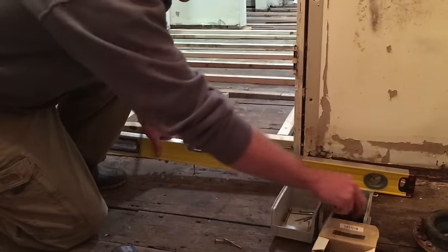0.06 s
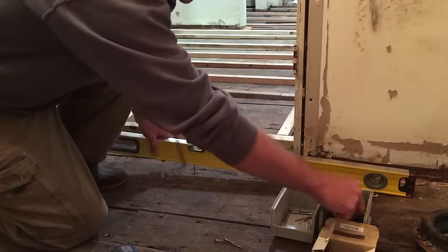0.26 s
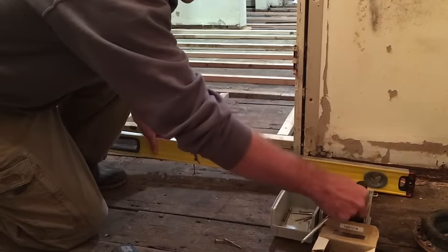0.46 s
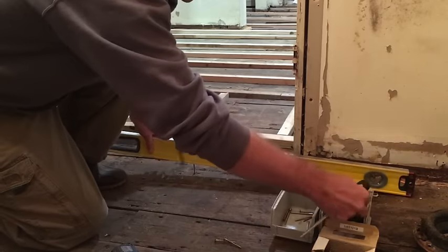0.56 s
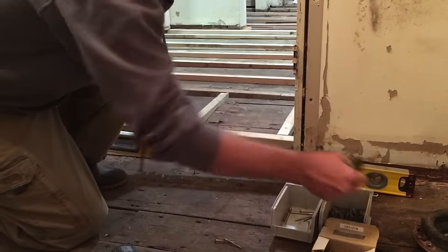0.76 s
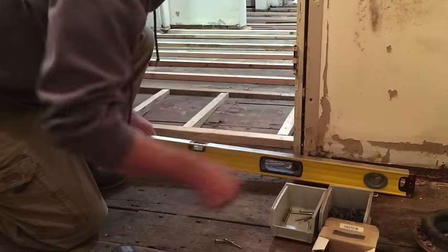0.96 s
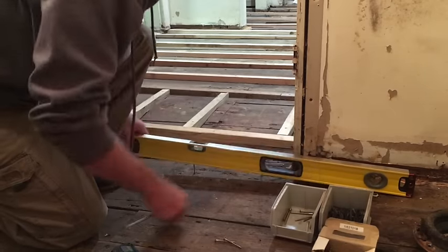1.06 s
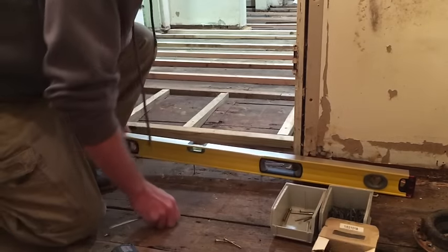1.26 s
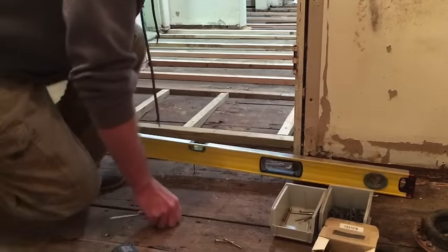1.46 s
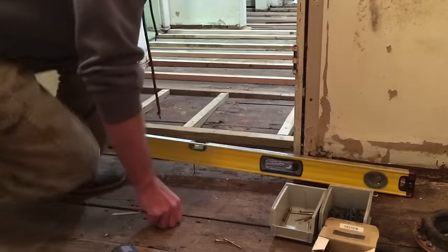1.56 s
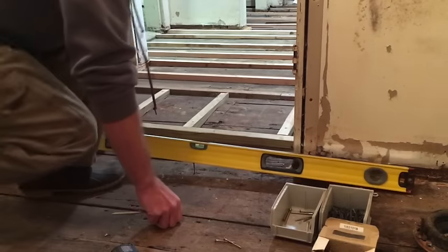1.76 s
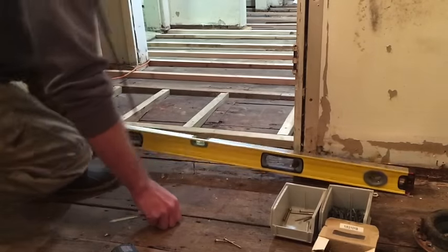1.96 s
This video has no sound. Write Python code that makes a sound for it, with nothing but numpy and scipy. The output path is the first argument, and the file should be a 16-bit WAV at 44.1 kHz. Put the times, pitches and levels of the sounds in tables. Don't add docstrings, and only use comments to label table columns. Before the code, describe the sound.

Loose screws rattle in a small plastic bin, stirred briskly from 0.17 to 0.55 s, with hollow wall knocks and bright jingles. One drops back at 0.67 s, landing hard at 0.77 s and ringing high. From 1 s clothes rustle, grit and a tool tick faintly, and a knee thuds on boards near 1.2 s. At 1.86 s a boot lands heavily, scuffs and squeaks. Low rumble, bare-room echo.

```python
import sys
import numpy as np
from scipy import signal
from scipy.fft import rfft, irfft
from scipy.io import wavfile
from scipy.ndimage import uniform_filter1d

SR = 44100
rng = np.random.default_rng(int(sys.argv[2]) if len(sys.argv) > 2 else 0)


def digitize_waveform(pressure):
    field = np.atleast_2d(pressure).T
    bounded = np.clip(field, -1, 1)
    quanta = np.round(bounded * 32767).astype(np.int16)
    wavfile.write(sys.argv[1], SR, quanta)


def to_linear_factor(level_db):
    exponent = np.asarray(level_db, float) / 20
    return 10 ** exponent


N = 88200


def unit(x):
    return x / np.sqrt(np.mean(x ** 2))


def conv(x, h):
    return signal.fftconvolve(x, h)[:N]


def colour(x, table):
    hz, db = np.array(table).T
    log_hz = np.log(np.arange(len(x) // 2 + 1) * SR / len(x) + 1)
    return irfft(rfft(x) * to_linear_factor(np.interp(log_hz, np.log(hz), db)), len(x))


def curve(table):
    rows = np.array(table, float).T
    return [np.interp(np.arange(N) / SR, rows[0], column) for column in rows[1:]]


def after(s):
    return np.arange(N) > s * SR


def walk(rate):
    k = int(SR / rate)
    steps = np.repeat(rng.standard_normal(N // k + 3), k)
    smooth = uniform_filter1d(uniform_filter1d(steps, k), k)
    return unit(smooth[k:N + k])


def fade(t60, size=8192):
    return np.exp(-np.log(1000) * np.arange(size) / SR / max(t60, .002))


def rise(x, s):
    return x * (1 - np.exp(-np.arange(len(x)) / SR / s))


def ring(modes, sizes, size=8192, detune=0.):
    t = np.arange(size) / SR
    luck = rng.standard_normal((len(modes), 2))
    out = 0
    for (hz, db, t60), weight, (shift, turn) in zip(modes, sizes, luck):
        tone = np.sin(2 * np.pi * hz * (1 + detune * shift) * t + np.pi * turn)
        out = out + weight * to_linear_factor(db) * tone * fade(t60, size=size)
    return out


def near(modes, hz, octaves):
    return np.exp(-(np.log2(np.array(modes)[:, 0] / hz) / octaves) ** 2)


def add(out, s, x):
    i = int(s * SR)
    out[i:i + len(x)] += x[:max(N - i, 0)]


def bands(low_hz=25):
    for hz in low_hz * 2. ** np.arange(10):
        shape = [(hz / 2, -30), (hz / 1.242, 0), (hz * 1.337, 0), (hz * 2, -30)]
        yield hz, colour(rng.standard_normal(N), shape)


# (frequency [Hz], level [dB per Hz])
ROOM_NOISE = [(12, -86), (20, -6.5), (113, -4.5), (277, -15), (310, -13), (472, -23), (1660, -30),
              (1910, -30.5), (16000, -51)]


def room_noise():
    flicker_db, level_db = .8, -51
    x = sum(noise * to_linear_factor(flicker_db * walk(8.5)) for _, noise in bands())
    return unit(colour(x, ROOM_NOISE)) * to_linear_factor(level_db)


# (frequency [Hz], level [dB per Hz])
CRACK = [(710, -15.5), (1200, -7.5), (4260, -13), (6000, -19.5), (10400, -29), (11800, -27), (12900, -38),
         (14800, -47.5), (16000, -40)]


def crack():
    x = colour(rng.standard_normal(size=1024), CRACK)
    return unit(x) * fade(0.015, size=1024) / 2


# (time [s], level [dB], brightness [dB])
STIR = [
    (.171, -51, -1),
    (.182, -30.5, -7.5),
    (.225, -34, -12),
    (.30, -28.5, -5),
    (.36, -42.5, -33),
    (.418, -46.5, 5),
    (.44, -43.5, 6),
    (.54, -43, -21),
    (.6, -64, -3),
]
# (time [s], level [dB], brightness [dB])
SETTLE = [
    (.672, -43.5, 3),
    (0.678, -39, -1.5),
    (0.762, -47, -4),
    (0.773, -28.5, -8),
    (0.818, -54, -1),
    (0.899, -86, -28),
]
# (time [s], wall knock [dB], metal crack [dB], strongest ring [Hz])
KNOCKS = [(0.178, -13, -22.5, 2480), (0.184, -15, -28, 1080), (0.189, -17.5, -43.5, 1040),
          (0.206, -15, -40, 1050), (0.2351, -17.5, -23, 1080), (.253, -13, -18, 1100),
          (.265, -25, -18, 2000), (.275, -15.5, -40, 1040), (.284, -12.5, -16.5, 2560),
          (.295, -14, -16, 1050), (.301, -16, -36, 1070), (.312, -16, -24, 3300), (0.411, -28, -35, 1500),
          (0.4217, -13, -22.5, 2550), (0.429, -18.5, -35, 1200), (0.478, -24.5, -55, 1000),
          (.453, -26, -40, 2500), (0.5214, -20.5, -22.5, 1760), (.674, -18, -24, 1150),
          (0.695, -10.5, -26, 1220), (.712, -23, -43.5, 1250), (0.74, -29.5, -36, 2300),
          (.7695, -18, -7.5, 1340), (.771, -7.5, -4, 1486), (.7735, -11.5, -8.5, 1570),
          (.780, -22, -17.5, 1630), (0.79, -22, -20, 1510), (.803, -23, -30.5, 1590),
          (.817, -38, -28, 1660)]
# (frequency [Hz], level [dB], t60 [s])
BIN_WALLS = [(681, -6, 0.026), (750, -7.5, 0.021), (863, -7.5, 0.018), (978.5, -2.5, 0.027),
             (1056, -0.5, 0.037), (1150, -2.5, 0.023), (1245, -4, 0.024), (1450, 1.5, 0.0087),
             (1712, -2.5, 0.023), (1813, -7.5, 0.0324), (2210, 0.5, 0.016), (2500, 3.5, 0.0128),
             (3060, -7.5, 0.031), (3542, -10, 0.0226)]
# (frequency [Hz], level [dB])
SHANKS = [(5550, 3), (7500, -5), (8850, 5.5), (11550, 3), (12250, -5), (14300, -2), (15050, -2)]


def screws_in_bin():
    contacts_per_s, scatter_db = 1500, 3.2
    contact_s = 0.00057
    jingle_db, jingle_t60_s = -7.5, 0.017
    wall_trim_db, crack_trim_db = -6, -1
    shanks = [(hz, db, jingle_t60_s) for hz, db in SHANKS]
    damped_walls = [(hz, db, t60 * .6) for hz, db, t60 in BIN_WALLS]
    out = np.zeros(N)
    for spot in range(8):
        struck = rng.random(N) < contacts_per_s / 8 / SR
        hits = struck * rng.standard_normal(N) * to_linear_factor(scatter_db * rng.exponential(size=N))
        wall_ring = ring(BIN_WALLS, np.ones(len(BIN_WALLS)), detune=0.02)
        wall = unit(conv(hits, rise(wall_ring, contact_s)))
        jingle = unit(conv(hits, ring(shanks, rng.random(len(shanks)), detune=0.015)))
        metal = unit(conv(hits, crack())) + to_linear_factor(jingle_db) * jingle
        for table in (STIR, SETTLE):
            db, bright_db = curve(table)
            on = after(table[0][0]) & (np.arange(N) < table[-1][0] * SR)
            out += on * to_linear_factor(db) * (wall + to_linear_factor(bright_db) * metal) / 3
    for s, wall_db, crack_db, hz in KNOCKS:
        knock = ring(damped_walls, near(BIN_WALLS, hz, 0.73), detune=0.02)
        add(out, s, to_linear_factor(wall_db + wall_trim_db) * rise(knock, contact_s))
        add(out, s, to_linear_factor(crack_db + crack_trim_db) * rise(crack(), contact_s / 2))
    return signal.sosfilt(signal.butter(6, 580, "high", fs=SR, output="sos"), out)


def bin_rumble():
    shake = colour(rng.standard_normal(N), [(50, -20), (110, -7.5), (260, -1), (420, -5), (700, -25.5)])
    stir_db = curve(STIR)[0]
    return unit(shake) * to_linear_factor(stir_db - 14.5 + 2 * walk(31)) * after(STIR[0][0])


# (time [s], frequency [Hz], level [dB], t60 [s])
SCREW_RINGS = [(.177, 14300, -45, .02), (.181, 5400, -42, .03), (.196, 8880, -49, .04),
               (.216, 11500, -50, .04), (.229, 15100, -48, .12), (.2352, 8800, -40, .03),
               (.2352, 11600, -42, .05), (.2352, 14400, -41, .03), (.241, 5600, -41, .03),
               (.262, 11500, -48, .05), (.281, 12250, -42, .06), (.284, 5600, -40, .03),
               (.33, 13900, -54, .2), (.364, 11500, -54, .02), (.411, 15100, -48, .03),
               (.413, 11550, -48, .03), (.4213, 11550, -39, .04), (.422, 6500, -45, .02),
               (.434, 11550, -43, .1), (.447, 7500, -44, .1), (.448, 7526, -58, .25),
               (.448, 8877, -48, .12), (.4537, 14430, -41, .025), (.466, 14300, -44, .025),
               (.468, 15000, -49, .16), (.481, 14300, -50, .03), (.522, 7526, -52, .04),
               (.541, 8877, -51, .04), (.556, 8877, -62, .12), (.674, 11970, -33, .38),
               (.684, 6158, -35, .22), (.674, 13160, -49, .15), (.674, 13890, -49, .15),
               (.770, 11990, -25, .12), (.75, 6169, -48, .2)]
# (time [s], frequency [Hz], level [dB], t60 [s])
TOOL_PINGS = [
    (1.0326, 3300, -54, .015),
    (1.0326, 4300, -56, .015),
    (1.1164, 4300, -51, .02),
    (1.295, 4300, -56, .015),
    (1.3229, 5500, -52, .015),
    (1.945, 4700, -52, .02),
]


def metal_rings(table):
    out = np.zeros(N)
    for s, hz, db, t60 in table:
        wobble = to_linear_factor(2. * walk(83)[:16384])
        tone = rise(ring([(hz, 0, t60)], [1], size=16384), 0.00013)
        add(out, s, to_linear_factor(db) * tone * wobble)
    return out


# (time [s], level [dB], strongest ring [Hz])
THUDS = [(0.186, -49.5, 241), (.28, -46, 290), (0.422, -41, 242), (0.549, -52, 101), (0.793, -45, 95.5),
         (0.858, -49, 88), (0.932, -52, 90), (0.982, -38.5, 91), (1.184, -37, 413), (1.191, -27, 169),
         (1.196, -35.5, 404), (1.197, -42, 530), (1.205, -34, 48), (1.212, -37.5, 172.7),
         (1.212, -37.5, 255), (1.231, -39.5, 345), (1.399, -34.5, 136.6), (1.497, -34.5, 293),
         (1.50, -44, 410), (1.524, -47, 410), (1.975, -36, 200), (1.71, -33.5, 82.1), (1.859, -22, 398),
         (1.859, -36.5, 2100), (1.858, -26.5, 695), (1.859, -31.5, 1120), (1.858, -38, 2550),
         (1.872, -25.5, 800), (1.861, -26, 249.6), (1.862, -27.5, 545), (1.866, -19.5, 149),
         (1.879, -20, 348), (1.880, -25, 533), (1.886, -21.5, 140), (1.899, -24, 250), (1.922, -26, 140),
         (1.925, -31.5, 354), (1.941, -27.5, 160), (1.961, -18.5, 52.8)]
# (frequency [Hz], level [dB], t60 [s])
BOARDS = [(48, 0, 0.2), (88, 0, 0.16), (141, 0, 0.1), (166, 0, 0.13), (250, 0, 0.08), (288, -3, 0.06),
          (345, 0, 0.07), (408, 0, 0.1), (540, 0, 0.06), (690, -3, 0.03), (800, -3, 0.02), (1117, 0, 0.03),
          (2000, 0, 0.04), (2550, -2, 0.027)]


def board_thuds():
    out = np.zeros(N)
    for s, db, hz in THUDS:
        thud = ring(BOARDS, near(BOARDS, hz, 0.14), size=16384, detune=0.0092)
        add(out, s, to_linear_factor(db) * rise(thud, 0.65 / hz))
    return out


# (time [s], level [dB])
RUSTLE = [
    (1.0, -62.5),
    (1.17, -73),
    (1.19, -60.5),
    (1.31, -68),
    (1.33, -58.5),
    (1.42, -58.5),
    (1.55, -62.5),
    (1.85, -60.5),
]
# (frequency [Hz], level [dB per Hz])
CLOTH = [(350, -0.5), (600, -1), (997, -3), (1130, -2.5), (4460, -10.5), (11800, -19), (16000, -28)]


def cloth_rustle():
    grains = rng.standard_normal(N) * to_linear_factor(0.74 * rng.exponential(size=N) + 2 * walk(39.6))
    fabric = unit(colour(grains, [(300, -8.0)] + list(CLOTH)))
    return fabric * to_linear_factor(curve(RUSTLE)[0]) * after(.9)


# (time [s], level [dB])
TICKS = [
    (0.9262, -31),
    (1.0326, -41),
    (1.1164, -43.5),
    (1.1797, -38),
    (1.295, -40.5),
    (1.3229, -33.5),
    (1.6902, -39),
    (1.8592, -40),
]


def grit_ticks():
    out = np.zeros(N)
    for s, db in TICKS:
        burst = unit(np.diff(colour(rng.standard_normal(size=1024), CLOTH)))
        add(out, s, to_linear_factor(db - 16) * burst * fade(0.01, size=1023))
    return out


# (time [s], level [dB])
SCUFF = [
    (1.85, -69),
    (1.86, -46.5),
    (1.9, -53),
    (1.93, -57),
    (2.0, -51),
]


def sole_scuff():
    hz = 1100
    grains = rng.standard_normal(N) * to_linear_factor(3.3 * rng.exponential(size=N))
    drag = colour(grains, [(hz / 3, -8), (hz, 0), (hz * 2, -6), (hz * 4, -30)])
    return unit(drag) * to_linear_factor(curve(SCUFF)[0])


# (time [s], frequency [Hz], level [dB])
CHIRP = [
    (1.915, 1044, -42.5),
    (1.925, 1100, -58),
    (1.957, 1270, -49),
    (1.97, 1340, -76),
]
# (time [s], frequency [Hz], level [dB])
SQUEAK = [
    (1.962, 500, -58),
    (1.98, 525, -31),
    (1.987, 545, -38),
    (1.995, 590, -34),
    (2.0, 610, -40),
]


def sole_squeak(table):
    hz, db = curve(table)
    rough = .015 * np.tanh(walk(100))
    phase = 2 * np.pi * np.cumsum(hz * (1 + rough)) / SR
    return after(table[0][0]) * to_linear_factor(db) * (np.sin(phase) + 0.049 * np.sin(3 * phase))


# (frequency [Hz], t60 [s])
ROOM = [(100, 0.4), (500, 0.34), (1500, 0.35), (4000, 0.3), (8000, 0.26), (14000, 0.14)]


def room():
    level_db, gap_s, size = -3.5, 0.0014, 32768
    f, t60 = np.array(ROOM).T
    tail = np.zeros(size)
    for hz, noise in bands():
        tail += noise[:size] * fade(np.interp(np.log(hz), np.log(f), t60), size=size)
    tail = tail * (1 - np.exp(-(np.arange(size) / SR / gap_s) ** 2))
    return to_linear_factor(level_db) * tail / np.sqrt(np.sum(tail ** 2))


def scene():
    thuds, tones = board_thuds(), metal_rings(SCREW_RINGS)
    near_sounds = screws_in_bin() + cloth_rustle() + grit_ticks() + sole_scuff()
    near_sounds += sole_squeak(CHIRP) + sole_squeak(SQUEAK)
    wet = conv(near_sounds + to_linear_factor(-8) * thuds + to_linear_factor(-8) * tones, room())
    unechoed = room_noise() + bin_rumble() + metal_rings(TOOL_PINGS)
    return (near_sounds + thuds + tones + wet + unechoed)[None]


def roll_off(x):
    return signal.sosfilt(signal.butter(12, 16480, fs=SR, output="sos"), x)


def record(dry):
    x = signal.sosfilt(signal.ellip(8, .2, 60, 15650, fs=SR, output="sos"), dry)
    return roll_off(x)


dry = scene()
out = record(dry)
digitize_waveform(out)
```